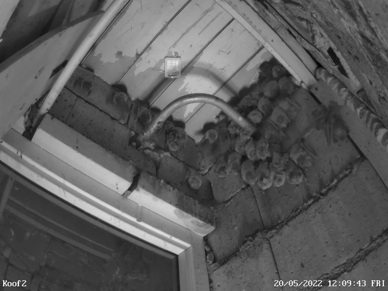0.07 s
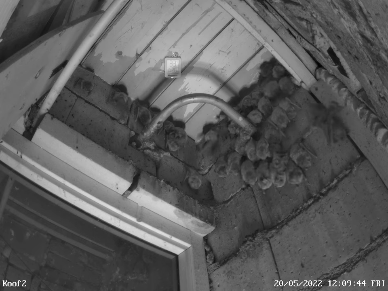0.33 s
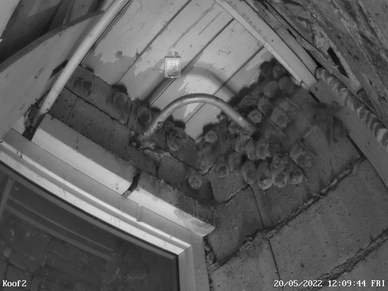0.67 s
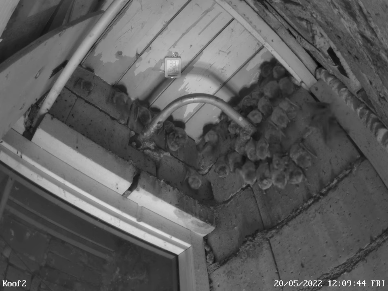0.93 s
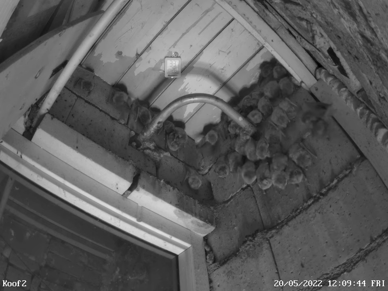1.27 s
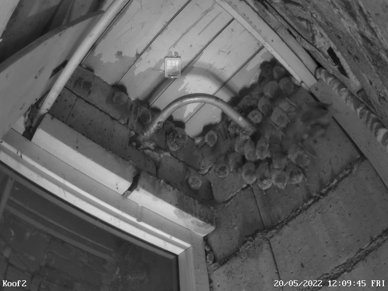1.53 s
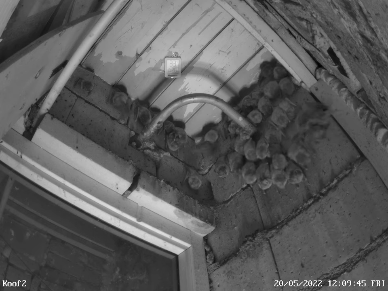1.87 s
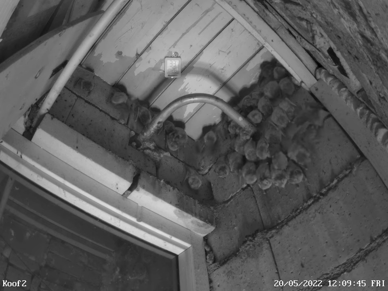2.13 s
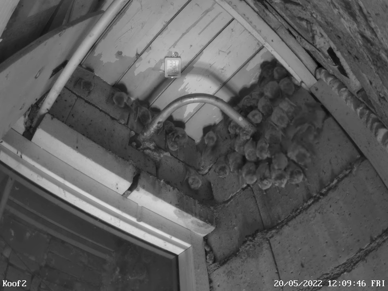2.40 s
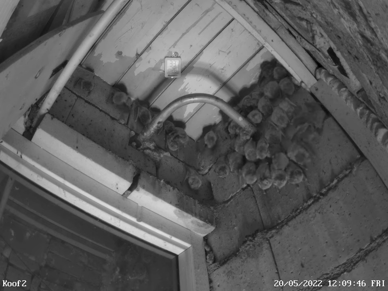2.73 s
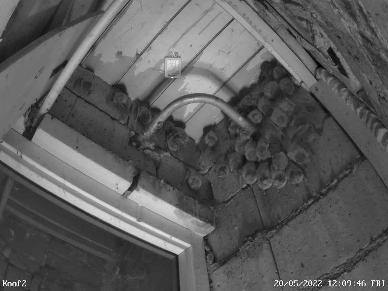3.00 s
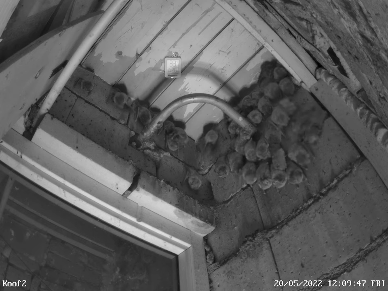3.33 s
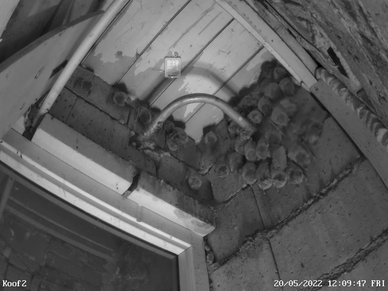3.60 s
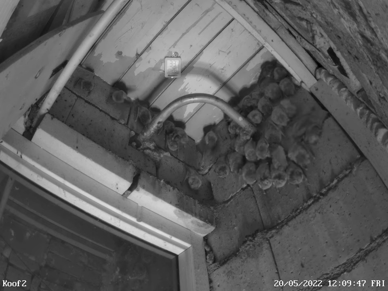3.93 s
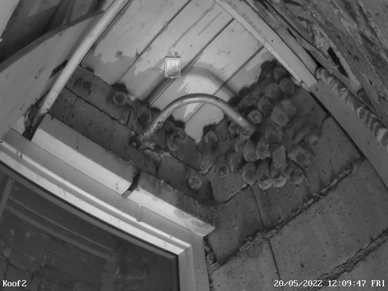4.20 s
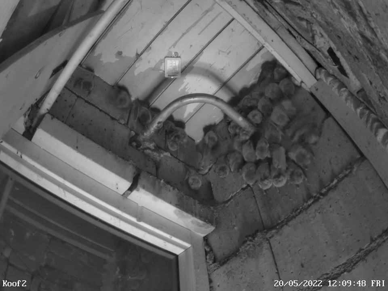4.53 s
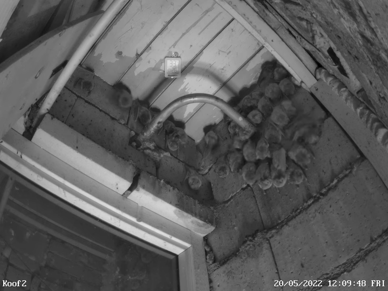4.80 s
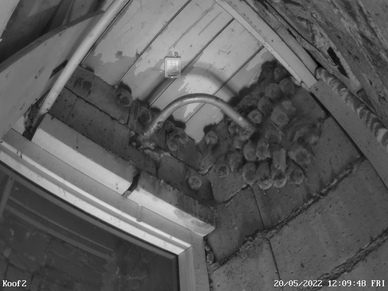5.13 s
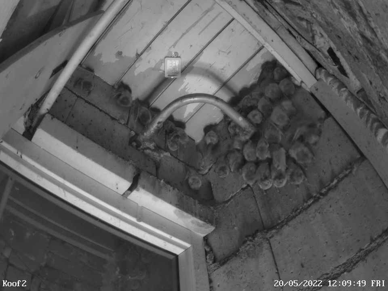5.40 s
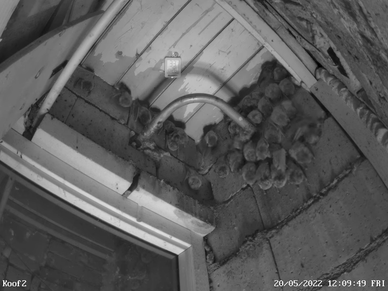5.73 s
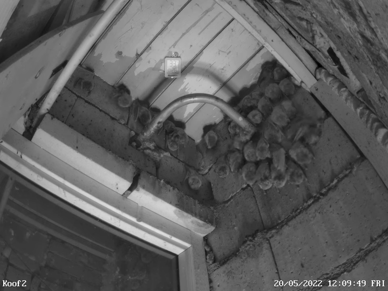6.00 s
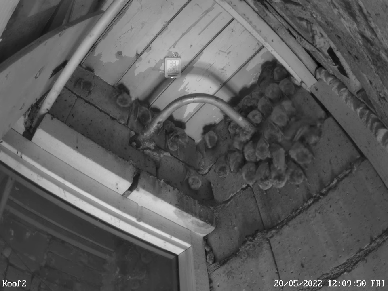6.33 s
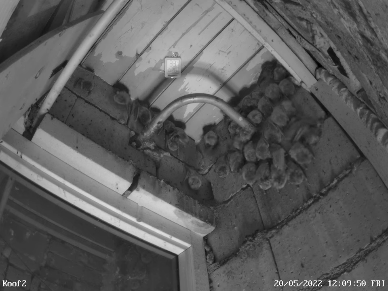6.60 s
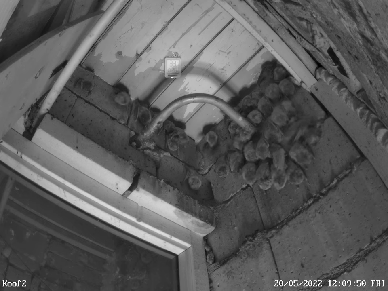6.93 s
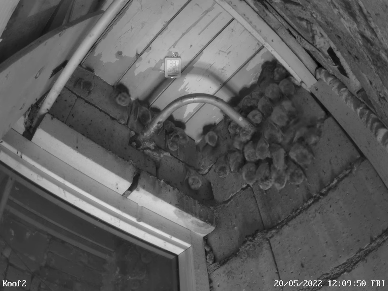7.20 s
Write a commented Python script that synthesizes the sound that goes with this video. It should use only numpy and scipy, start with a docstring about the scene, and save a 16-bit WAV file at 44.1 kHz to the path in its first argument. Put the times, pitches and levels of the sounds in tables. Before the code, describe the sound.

Bats roost under a wooden roof, close to a small microphone. A low, throbbing drone, electrical hum and rumble run underneath while claws tick faintly on boards and wings softly stir the air. A run of short, high squeaks follows. Then a harsh, buzzing squabble breaks out with a wingbeat puffing at the microphone, and after a lull it flares again.

```python
"""Bats roost under a roof, close to a small camera. From the start, a low drone beats against mains hum
over rumble and faint electronic ticks, while claws tick on the boards and far wings waft the air.
From 3 s come single squeaks: gliding whistles that fray into a rasp as the effort eases.
At 5.5 s a squabble of buzzing, open-mouthed screeches breaks out and a wingbeat puffs at the microphone.
After a lull, the squabble flares again at 7.1 s."""
import sys
import numpy as np
from scipy import signal
from scipy.fft import rfft, irfft, next_fast_len
from scipy.io import wavfile
from scipy.ndimage import uniform_filter1d, map_coordinates

SR = 44100
rng = np.random.default_rng(int(sys.argv[2]) if len(sys.argv) > 2 else 0)


def unload_audio(sound):
    """Save the sound as a 16-bit wav file, at the path given as the first command line argument."""
    columns = np.transpose(np.atleast_2d(sound))
    # keep every value between -1 and 1, then stretch to whole-number steps
    steps = np.round(np.clip(columns, -1, 1) * 32767)
    wavfile.write(sys.argv[1], SR, steps.astype(np.int16))


N = 324135
TIME = np.arange(N) / SR
TOP_HZ = 10800
# colour of scratching claws and rubbing fur: (frequency [Hz], level [dB])
SCRATCH_COLOUR = [(600, -24), (1400, -16.5), (1900, -10), (2500, 3.5), (3700, 3.5), (5000, -6), (8000, -16),
                  (10500, -34.5)]


def squeaks():
    """A gliding whistle, purest at full effort; it sags and breaks into a rasp as the effort eases."""
    # (time [s], length [s], level [dB], pitch [Hz], glide [Hz], crest [share of length], swell [dB],
    #  rasp [share], brightness [dB])
    calls = [(0.887, 0.051, -52.5, 2250, 100, .15, 7, .35, -21),
             (3.072, 0.059, -38.5, 3249, -600, 0.44, 2.5, 0.9, 0),
             (3.259, 0.079, -29.5, 3493, -130, 0.75, 5.5, .18, 2.5),
             (3.433, .085, -21.5, 3824, 0, .29, 18, .025, 0.5),
             (3.614, 0.033, -32.5, 3520, -500, .5, 3.5, 0.6, 2.5),
             (3.966, 0.059, -32.5, 3620, 99, 0.47, 2.5, .85, -2.5),
             (4.031, .024, -36.5, 3650, 101, .5, 2, .95, 8),
             (5.499, .029, -38, 3205, 200, .45, 0.5, 0.14, -10), (5.56, .1, -29, 3660, -3, .36, 3, .42, -3),
             (5.772, .028, -32.5, 3030, 380, 0.496, 1, .7, -5),
             (5.793, .15, -39.5, 3767, -0.5, 0.19, 3.5, 0.05, -3),
             (5.826, .018, -33, 3240, -200, 0.45, 0, .25, -6),
             (7.12, 0.022, -35, 2900, -80, 0.44, 1, .55, 0.5),
             (7.145, 0.026, -30.5, 3110, -250, .5, 2.5, 0.27, -0.5),
             (7.266, .092, -30.5, 3290, 1, .15, 3, .22, -4.5)]
    # colour of the rasp: (frequency [Hz], level [dB])
    rasp_colour = [(350, -70), (600, -37.5), (902, -13), (1150, -28.5), (1550, -26.5), (1890, -22),
                   (2060, -18.5), (2880, -1.5), (3750, 0.5), (4940, -31.5), (6270, -18), (6820, -13),
                   (8070, -12), (9890, -36.5), (10500, -49), (13600, -85.5), (22000, -120)]
    sag_per_db, fray_per_db, fray_after_db = .0035, .04, 6
    rasp = housing(buzz(rate_hz=350, jitter=.17, breathy=.33), rasp_colour)
    edge = treble(rasp)
    gruff = amp(-29) * resonate(rasp, 1600, width_hz=300, lift_db=32.5)
    quiver, flutter, waver = wobble(600), wobble(350), wobble(130)
    out = np.zeros(N)
    for start, length, db, hz, glide_hz, crest, swell_db, rasp_share, bright_db in calls:
        span, t, envelope = gesture(start, length, attack=.009, release=.008)
        eased_db = slack(t, length, crest, swell_db)
        rough = np.clip(rasp_share + fray_per_db * np.maximum(eased_db - fray_after_db, 0), 0, 1)
        pitch = (hz + glide_hz * (np.minimum(t / length, 1) - crest)) * (1 - sag_per_db * eased_db)
        pitch *= 1 + .07 * rough * quiver[span] + .0073 * waver[span]
        tremble = amp(3.4 * rough * flutter[span] + 1.7 * waver[span])
        whistle = unit(np.sin(2 * np.pi * np.cumsum(pitch) / SR) * tremble)
        cry = rasp[span] + (amp(bright_db) - 1) * edge[span]
        throat = resonate(cry, .94 * hz, width_hz=500, lift_db=7)  # rings just under the whistle
        voice = np.sqrt(1 - rough) * whistle + np.sqrt(rough) * throat + gruff[span]
        out[span] += amp(db - eased_db) * envelope * voice
    return out


def screeches():
    """A wide, harsh buzz through an open mouth; the harder the push, the brighter it is."""
    # (time [s], length [s], level [dB], crest [share of length], swell [dB], brightness [dB],
    #  throat resonance [Hz])
    calls = [(5.479, .013, -40, .4, 0.5, -18, 2427), (5.576, .285, -33, .46, 8, 3, 2710),
             (5.868, 0.076, -35.5, .6, 3.5, 0, 2150), (7.117, .056, -46, .4, 2, -24, 1390),
             (7.237, 0.15, -35, 0.72, 2.5, -2, 2800)]
    # colour of the open-mouthed voice: (frequency [Hz], level [dB])
    harsh_colour = [(290, -51), (500, -14.5), (793, -19.5), (890, -5.5), (1030, -12.5), (1920, -8),
                    (2080, -9), (2240, -14.5), (2420, -5), (3420, -1.5), (3700, -2), (5360, -8.5),
                    (7020, -11.5), (9070, -16.5), (10700, -42.5), (13900, -73.5), (22000, -120)]
    voice = housing(buzz(rate_hz=540, jitter=.3, breathy=.35), harsh_colour) * amp(1.3 * wobble(120))
    edge = treble(voice)
    out = np.zeros(N)
    for start, length, db, crest, swell_db, bright_db, throat_hz in calls:
        span, t, envelope = gesture(start, length, attack=.0038, release=.004)
        eased_db = slack(t, length, crest, swell_db)
        cry = voice[span] + (amp(bright_db - eased_db) - 1) * edge[span]
        out[span] += amp(db - eased_db) * envelope * resonate(cry, throat_hz, width_hz=340, lift_db=5.5)
    return out


def buzz(rate_hz, jitter, breathy):
    """Uneven snaps of the vocal membranes, with a spurt of air in every cycle."""
    cycles = np.cumsum(rate_hz * np.exp(jitter * wobble(300) + .15 * wobble(25))) / SR
    snaps = np.diff(np.floor(cycles), prepend=0) * amp(2 * rng.standard_normal(N))
    t = np.arange(SR // 800) / SR
    sweeps = signal.fftconvolve(snaps, signal.chirp(t, TOP_HZ, t[-1], 0))[:N]  # each snap dives in pitch
    air = rng.standard_normal(N) * np.exp(-2.5 * (cycles % 1))
    return np.sqrt(1 - breathy) * unit(sweeps) + np.sqrt(breathy) * unit(air)


def slack(t, length, crest, swell_db, crest_width=.3):
    """The dB by which a call lies below full effort: it swells to one crest and eases off."""
    return swell_db * (1 - np.exp(-((t / length - crest) / crest_width) ** 2))


def claws(scratch_db, knock_db, t60):
    """Each claw scratches briefly, with a ring of its own, and knocks the board under it."""
    # claw strikes: (time [s], level [dB], knock trim [dB], ring [Hz])
    strikes = [(0.054, -49, -14, 4230), (.1421, -53, -14, 2760), (.386, -52, -20, 4170),
               (.42, -46, -25, 4200), (.5083, -48.5, -6, 2554), (0.6908, -57.5, 0, 3730),
               (0.8902, -41, -34, 3100), (1.2412, -46.5, -18, 2650), (1.83, -65.5, 12, 2160),
               (1.966, -53.5, -5, 2590), (2.595, -49, -14, 3266), (6.2144, -56, -14, 2680),
               (7.0467, -47, 9.5, 3710), (7.221, -53, -4, 3710)]
    # colour of a knocked board: (frequency [Hz], level [dB])
    board_colour = [(300, -20), (480, -13.5), (580, 2), (700, -13), (900, 10.5), (1400, -7.5),
                    (1900, -20.5), (4000, -41.5)]
    scratch = housing(rng.standard_normal(N), SCRATCH_COLOUR)
    board = housing(rng.standard_normal(N), board_colour)
    out = np.zeros(N)
    for start, db, trim_db, ring_hz in strikes:
        span, t, envelope = gesture(start - .001, t60, attack=.0012, release=.003)
        tick = amp(scratch_db) * resonate(scratch[span], ring_hz, width_hz=310, lift_db=11.5)
        knock = amp(knock_db + trim_db) * board[span]
        out[span] += amp(db - 60 * t / t60) * envelope * (tick + knock)
    return out


def wings(puff_at_s, puff_db, hold_s):
    """Wingbeats buffet the microphone: soft wafts, and one close puff that rises, holds and dies away."""
    # air from wings further off: (time [s], length [s], level [dB])
    wafts = [(0.035, 0.16, -43.5), (0.365, 0.054, -34.5), (0.84, 0.14, -43), (1.003, 0.1, -47),
             (1.417, 0.077, -46), (3.805, 0.18, -49)]
    # colours of the close puff and the far wafts: (frequency [Hz], level [dB])
    puff_colour = [(24, -25), (40, 0.5), (160, -2), (238, -10.5), (314, -33.5), (418, -22.5), (501, -34),
                   (700, -42.5), (910, -71), (1540, -120)]
    waft_colour = [(20, -7.5), (45, -2.5), (85, 8.5), (110, 0), (170, -14), (300, -28.5), (600, -63)]
    rise_db_per_s, fall_db_per_s = 802, 121
    before, after = np.maximum(puff_at_s - TIME, 0), np.maximum(TIME - puff_at_s - hold_s, 0)
    out = amp(puff_db - rise_db_per_s * before - fall_db_per_s * after) * noise(puff_colour)
    air = noise(waft_colour)
    for start, length, db in wafts:
        span, _, envelope = gesture(start, length, attack=.03, release=.016)
        out[span] += amp(db) * envelope * air[span]
    return out


def shuffles():
    """Fur and wing skin rub in uneven little strokes."""
    # bats jostling: (time [s], length [s], level [dB])
    strokes = [(0.044, 0.095, -73.5), (0.853, 0.038, -62.5), (2.594, 0.12, -77.5), (4.832, 0.17, -74.5),
               (5.443, 0.057, -61.5), (5.935, 0.07, -68), (7.072, 0.055, -71.5)]
    rub = unit(noise(SCRATCH_COLOUR) * amp(3.5 * wobble(83)))
    out = np.zeros(N)
    for start, length, db in strokes:
        span, _, envelope = gesture(start, length, attack=.03, release=.015)
        out[span] += amp(db) * envelope * rub[span]
    return out


def corner(x, scatter_db, t60):
    """Boards right beside the roost scatter the sound within milliseconds and comb its spectrum."""
    t = np.arange(SR // 16) / SR
    echoes = rng.standard_normal(len(t)) * amp(-60 * t / t60)
    return signal.fftconvolve(x, amp(scatter_db) * echoes / np.linalg.norm(echoes) + (t == 0))[:N]


def housing(x, colour):
    """Colours a source, scatters it off the corner and lets the camera housing ring with it; rms 1."""
    # housing resonances: (centre [Hz], width [Hz], lift [dB])
    modes = [(920, 160, 2), (1334, 160, 5.5), (2300, 190, 4.5), (3260, 210, 3), (3708, 150, 9.5),
             (4308, 219.5, 6.5), (5870, 139, 5), (6540, 150, 10), (7210, 260, 7)]
    lift = lambda hz: sum(db / (1 + (2 * (hz - centre) / width) ** 2) for centre, width, db in modes)
    scattered = corner(x, scatter_db=-8, t60=.06)
    return unit(filtered(scattered, lambda hz: amp(along(colour, hz) + lift(hz))))


def roof(x):
    """The roof boards answer with a short tail."""
    # decay of the tail: (frequency [Hz], t60 [s])
    decay = [(500, 0.042), (3500, 0.09), (10000, 0.047)]
    hz, t, bands = signal.stft(rng.standard_normal(SR // 3), SR, nperseg=256)
    tail = signal.istft(bands * amp(-60 * t / along(decay, hz)[:, None]), SR, nperseg=256)[1]
    return signal.fftconvolve(x, tail / np.linalg.norm(tail))[:N]


def drone(trim_db, octave_db):
    """A low tone with a faint octave swells and fades, close enough to the mains hum to beat with it."""
    # course of the drone: (time [s], pitch [Hz], level [dB])
    course = [(0.0, 56.1, -47), (0.12, 56.4, -52), (0.28, 59.56, -29), (0.55, 58.57, -48),
              (1.05, 59.34, -43.5), (1.46, 59.99, -26.9), (1.97, 59.47, -33.5), (2.2, 58.4, -25.1),
              (2.42, 58.78, -32), (2.9, 57.67, -35), (3.16, 58.07, -31.5), (3.5, 59.29, -53),
              (3.85, 58.68, -43.6), (4.5, 62.07, -48.5), (5.3, 59.88, -55), (7.35, 59.7, -54.5)]
    pitch, db = curves(course)
    phase = 2 * np.pi * np.cumsum(pitch) / SR
    level = np.sqrt(2) * amp(trim_db + db + .87 * wobble(8))
    octave = amp(octave_db + 2 * wobble(4.3)) * np.cos(2 * phase)
    return level * (np.cos(phase) + octave)


def ambience(hiss_db):
    """Rumble and outdoor air settle over a steady hiss."""
    # (time [s], rumble level [dB], air level [dB])
    levels = [(0, -36, -64), (2.2, -39, -65), (3.7, -38.5, -66.5), (4.4, -44, -69), (7.35, -44.5, -69.4)]
    # colours of the three noise beds: (frequency [Hz], level [dB])
    rumble_colour = [(8, 7), (33, 15), (48, 1.5), (70, 1.5), (95, -7.5), (120, -2.5), (180, -18.5),
                     (215, -11.5), (290, -24.5), (450, -72.5)]
    air_colour = [(150, -6.5), (260, -2), (320, -4.5), (450, 3), (650, -5.5), (850, -7), (1200, -16),
                  (2000, -27), (4000, -51)]
    hiss_colour = [(710, -38), (1200, -6), (1430, -6), (2450, -4.5), (3000, -6), (3540, -3), (3880, -9),
                   (4410, -5.5), (4700, -12), (5050, -9.5), (5750, -4), (9340, -22.5), (10700, -37),
                   (13900, -59), (22000, -120)]
    rumble_db, air_db = curves(levels)
    rumble = amp(rumble_db + 1.5 * wobble(3)) * noise(rumble_colour)
    air = amp(air_db + 1.8 * wobble(13)) * noise(air_colour)
    return rumble + air + amp(hiss_db) * noise(hiss_colour)


def hum(mains_hz):
    """Steady mains hum whose seventh harmonic wavers."""
    # steady harmonics: (multiple of the mains frequency, level [dB])
    harmonics = [(1, -36), (3, -53), (5, -65), (9, -76), (11, -75.5), (13, -92), (15, -81), (17, -82)]
    # course of the seventh harmonic: (time [s], level [dB])
    seventh_level = [(0, -69), (.85, -68.5), (1.1, -76.5), (1.9, -67), (2.6, -67), (2.85, -83), (3.1, -65),
                     (3.55, -65.5), (3.75, -85.5), (4.11, -62.5), (4.5, -76), (4.73, -65.5), (4.95, -79),
                     (5.6, -66), (6.4, -63), (6.59, -79), (6.87, -59), (7.12, -76.5)]
    harmonic = lambda k: np.sqrt(2) * np.cos(2 * np.pi * k * mains_hz * TIME)
    seventh = amp(curves(seventh_level)[0] + 1.1 * wobble(8)) * harmonic(7)
    return sum(amp(db) * harmonic(k) for k, db in harmonics) + seventh


def ticks(grit, group_s, spacing_s):
    """The electronics tick faintly in repeating groups; phase jitter makes each tick gritty."""
    # tones in a tick: (frequency [Hz], level [dB], delay [s])
    tones = [(5700, -71.5, 0.0031), (5000, -71, 0.0013), (4419.5, -74, 0.027), (3520, -69.5, .008)]
    from_tick = (TIME - .04) % group_s % spacing_s - spacing_s / 2
    out = np.zeros(N)
    for hz, db, delay in tones:
        blip = np.exp(-((from_tick - delay) / .008) ** 2) * amp(db + 1.1 * wobble(5))
        out += blip * np.sin(2 * np.pi * hz * TIME + grit * wobble(700))
    return out


def whine():
    """Thin, high tones of the electronics, fuzzy because their phase wanders."""
    # (frequency [Hz], level [dB])
    tones = [(5090, -86), (3520, -90.5), (6250, -90.5)]
    return sum(np.sqrt(2) * amp(db) * np.sin(2 * np.pi * hz * TIME + 2 * wobble(150)) for hz, db in tones)


def gesture(start, length, attack, release):
    """The samples that one event covers, their times from its start, and its envelope."""
    span = slice(int(start * SR), min(N, int((start + 2 * length + 10 * release) * SR)))
    t = TIME[span] - TIME[span][0]
    rise = np.sin(np.pi / 2 * np.minimum(t / attack, 1)) ** 2
    return span, t, rise * np.exp(-np.maximum(t - length + release, 0) / release)


def resonate(x, hz, width_hz, lift_db):
    """x with one resonance lifted; rms 1."""
    b, a = signal.iirpeak(hz, hz / width_hz, SR)
    return unit(x + (amp(lift_db) - 1) * signal.lfilter(b, a, x))


def treble(x):
    """The sharp upper edge of a voice."""
    return filtered(x, lambda hz: 1 - 1 / (1 + (hz / 5500) ** 6))


def noise(colour):
    """Coloured noise; rms 1."""
    return unit(filtered(rng.standard_normal(N), lambda hz: amp(along(colour, hz))))


def filtered(x, response):
    """x shaped by a gain that depends on frequency."""
    size = next_fast_len(N + SR // 4)
    return irfft(rfft(x, size) * response(np.fft.rfftfreq(size, 1 / SR)), size)[:N]


def wobble(rate):
    """A smooth random curve, rate knots a second."""
    knots = rng.standard_normal(SR // 2)
    coarse = TIME[::8]
    return np.interp(TIME, coarse, map_coordinates(knots, [coarse * rate], mode="mirror"))


def curves(rows):
    """One value per sample for each column after the time."""
    times, *columns = np.transpose(rows)
    return [np.interp(TIME, times, column) for column in columns]


def along(points, hz):
    """Reads (frequency, value) points along a log axis."""
    freqs, values = np.transpose(points)
    return np.interp(np.log(hz + 1), np.log(freqs + 1), values)


def amp(db):
    """Decibels as a gain."""
    return 10 ** (np.asarray(db) / 20)


def unit(x):
    """x at rms 1."""
    return x / np.sqrt(np.mean(x ** 2) + 1e-20)


def scene():
    """The bats and their echo under the roof, over the drone, the ambience and the electronics."""
    bats = squeaks() + screeches() + shuffles() + claws(scratch_db=-7.5, knock_db=-5, t60=.057)
    bed = drone(trim_db=-.05, octave_db=-25.5) + ambience(hiss_db=-74.5)
    electronics = ticks(grit=1.8, group_s=.75, spacing_s=.2) + hum(mains_hz=50) + whine()
    echo = amp(-13) * roof(bats)
    wing_air = wings(puff_at_s=5.59, puff_db=-29, hold_s=.089)
    return (bats + echo + wing_air + bed + electronics)[None]


def record(dry):
    """The sound fades in and out; the treble drops out in brief spells, and nothing passes above TOP_HZ."""
    # spells without treble: (start [s], end [s])
    dull_spells = [(3.069, 3.127), (3.261, 3.639), (3.965, 4.023), (5.44, 5.622), (7.1, 7.286)]
    fade_s, dull_hz = .012, 4610
    from_ends = np.minimum(TIME, TIME[::-1])
    x = dry[0] * np.sin(np.pi / 2 * np.minimum(from_ends / fade_s, 1)) ** 2
    in_spell = sum(1.0 * ((TIME > start) & (TIME < end)) for start, end in dull_spells)
    dull = uniform_filter1d(in_spell, size=64)
    highs = filtered(x, lambda hz: np.clip((hz - dull_hz) / 200 + .5, 0, 1))
    return filtered(x - dull * highs, lambda hz: hz < TOP_HZ)[None]


dry = scene()
out = record(dry)
unload_audio(out)
```